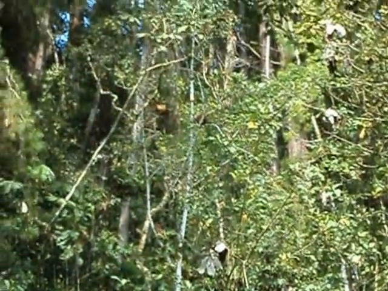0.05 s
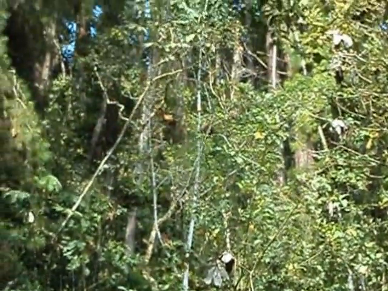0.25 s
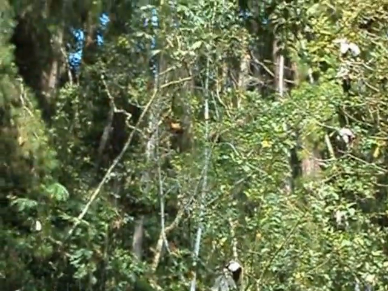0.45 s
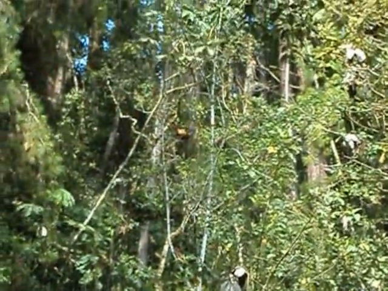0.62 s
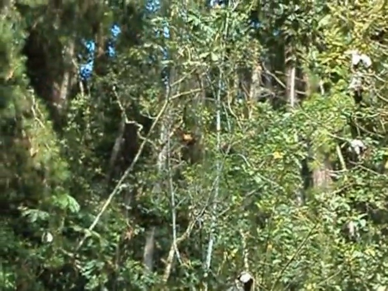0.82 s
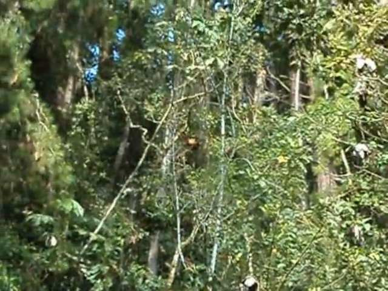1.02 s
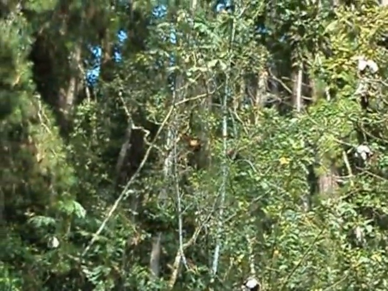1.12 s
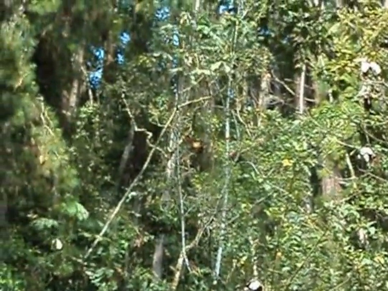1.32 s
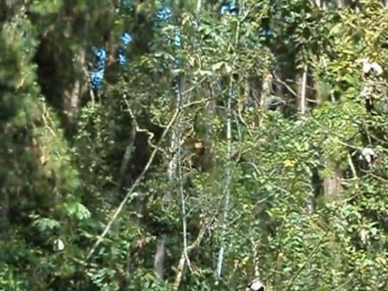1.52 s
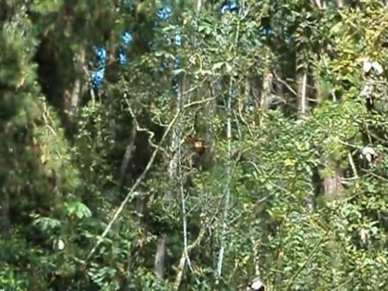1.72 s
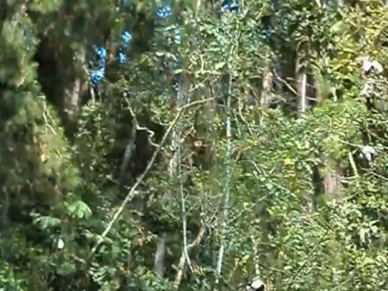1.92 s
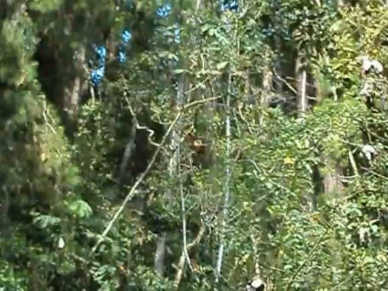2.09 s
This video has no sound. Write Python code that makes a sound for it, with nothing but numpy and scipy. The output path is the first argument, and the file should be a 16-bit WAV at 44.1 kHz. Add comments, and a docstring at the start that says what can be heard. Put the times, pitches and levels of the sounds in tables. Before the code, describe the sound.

One loud, sharp handling snap on a camera cuts into a faint, even outdoor hiss in a forest. Two dull pops come next, the hiss slowly recovers, and fingers click lightly on the case, close to the slightly muffled microphone.

```python
"""In a forest, on the microphone of a handheld camera: a soft, even hiss, and the case clicking
under the fingers. One hard snap right by the microphone overloads it; the gain control ducks the
forest and lets it swell back over a second. Two dull pops, the first on the heels of the snap, and
a few lighter clicks follow. The narrow-band recorder leaves little above 6 kHz."""
import sys
import numpy as np
from scipy import signal
from scipy.fft import rfft, irfft
from scipy.io import wavfile

SR = 44100
rng = np.random.default_rng(int(sys.argv[2]) if len(sys.argv) > 2 else 0)


def int16_out(signal):
    """Quantize to a 16-bit WAV file."""
    q = np.round(np.clip(np.atleast_2d(signal).T, -1, 1) * 32767)
    wavfile.write(sys.argv[1], SR, q.astype(np.int16))


N = 94815
T = np.arange(N) / SR


def from_db(db):
    """Decibels to gain."""
    return 10 ** (np.asarray(db) / 20)


def noise(gain):
    """Noise of rms 1 whose spectrum follows gain(Hz)."""
    hz = np.maximum(np.fft.rfftfreq(N, 1 / SR), 1)
    x = irfft(rfft(rng.standard_normal(N)) * gain(hz), N)
    return x / np.sqrt(np.mean(x ** 2) + 1e-20)


def noise_band(centre_hz, half_width_hz):
    """Noise of rms 1, 6 dB down at half_width_hz from its centre."""
    return noise(lambda hz: 1 / (1 + ((hz - centre_hz) / half_width_hz) ** 2))


def ring(start, modes):
    """Decaying sines, struck together at start seconds."""
    age = np.maximum(T - start, 0)
    return sum(from_db(db - 60 * np.minimum(age / t60, 10)) * np.sin(2 * np.pi * hz * age)
               for hz, db, t60 in modes)


def resonance(start, hz, width_hz):
    """One impulse through a resonance, peaking near 1."""
    impulse = np.full(N, 1e-18)
    impulse[int(start * SR)] = 0.47
    r = np.exp(-np.pi * width_hz / SR)
    return signal.lfilter([1, 0, -1], [1, -(1 + r * r) * np.cos(2 * np.pi * hz / SR), r * r], impulse)


def forest():
    """The forest air: a broad, slightly wavering hiss with a few faint, fluttering whirrs."""
    # Spectrum of the air. Each row: frequency in Hz, relative level in dB.
    air_spectrum = [(25, -0.5), (70, 3), (250, 0.5), (600, -1), (1100, -7), (2000, -11.5), (3000, -16),
                    (4900, -18.5), (5600, -25.5), (7000, -20)]
    # Narrow whirrs. Each row: centre in Hz, half-width in Hz, level in dB.
    whirr_bands = [(3380, 390, -67), (3960, 95, -68), (4220, 150, -67.5)]
    air_db, waver_db, flutter_db = -50, 0.5, 1
    points_hz, points_db = np.transpose(air_spectrum)
    air = noise(lambda hz: from_db(np.interp(np.log(hz), np.log(points_hz), points_db)))
    waver = noise_band(0, half_width_hz=6)
    flutter = noise_band(0, half_width_hz=15)
    whirrs = sum(from_db(db + flutter_db * flutter) * noise_band(hz, half_width)
                 for hz, half_width, db in whirr_bands)
    return from_db(air_db + waver_db * waver) * air + whirrs


def hard_snap():
    """The case snaps right by the microphone and rings briefly."""
    # Modes of the snap. Each row: frequency in Hz, level in dB, seconds to fall 60 dB.
    snap_modes = [(876, 1.5, 0.0053), (2963, -10.5, .02), (3370, 10, .0054), (6040, -1.8, 0.0053)]
    start, attack_s = 0.2188, 0.00019
    attack = 1 - np.exp(-np.maximum(T - start, 0) / attack_s)
    return ring(start, snap_modes) * attack


def gain_control(x):
    """The camera ducks just after a peak passes the threshold, holds, then recovers steadily."""
    threshold_db, reaction_s, hold_s, recovery_db_per_s = -10, 0.000747, 0.11, 17.5
    over_db = np.maximum(20 * np.log10(np.abs(x) + 1e-9) - threshold_db, 0)
    recovery_db = recovery_db_per_s * T
    duck_db = np.maximum.accumulate(over_db + recovery_db) - recovery_db
    held_db = np.maximum(duck_db, np.interp(T - hold_s, T, duck_db))
    return x * from_db(-np.interp(T - reaction_s, T, held_db))


def dull_pops():
    """The signal's resting level jumps, overshoots briefly and drifts back."""
    # Jumps in resting level. Each row: start in seconds, signed height, settling time in seconds.
    jumps = [(0.2211, -0.008, 0.57), (0.6217, 0.0087, 0.36)]
    rise_s, overshoot_s = 0.00007, 0.00083
    pops = np.zeros(N)
    for start, height, settle_s in jumps:
        age = np.maximum(T - start, 0)
        rise = 1 - np.exp(-age / rise_s)
        overshoot = 0.91 * np.exp(-age / overshoot_s)
        pops += height * rise * (np.exp(-age / settle_s) + overshoot)
    return pops


def light_clicks():
    """Under the fingers, each contact ticks, sets the case ringing and knocks the whole camera."""
    # Contacts on the case. Each row: start in seconds, tick peak in dB, tick centre in Hz,
    # tick width in Hz, low-pass in Hz, case ring in dB, knock in dB.
    contacts = [(1.1095, -41.5, 1500, 2500, 3500, -43, -55), (1.1400, -27.5, 3900, 900, 5560, -56, -55),
                (1.1407, -28.5, 1150, 595, 5000, -74, -64), (1.2419, -21, 900, 3400, 3840, -42, -29),
                (1.6003, -13.5, 2190, 3280, 4130, -26, -48), (1.6783, -18, 1960, 3400, 3860, -28, -31),
                (1.8612, -32, 4100, 600, 5000, -65, -61.5), (1.8634, -19.5, 3990, 895, 4500, -61, -46)]
    # Modes of the case. Each row: frequency in Hz, relative level in dB, seconds to fall 60 dB.
    case_modes = [(1081, -3, 0.019), (2410, -2.5, .010), (3240, -9, .010)]
    knock_hz, knock_t60_s = 640, 0.011
    clicks = np.zeros(N)
    for start, tick_db, tick_hz, width_hz, lowpass_hz, ring_db, knock_db in contacts:
        soften = signal.butter(2, lowpass_hz, fs=SR, output="sos")
        tick = signal.sosfilt(soften, resonance(start, tick_hz, width_hz))
        case = sum(from_db(db) * resonance(start, hz, width_hz=np.log(1000) / (np.pi * t60))
                   for hz, db, t60 in case_modes)
        knock = ring(start, [(knock_hz, knock_db, knock_t60_s)])
        clicks += from_db(tick_db) * tick / np.abs(tick).max() + from_db(ring_db) * case + knock
    return clicks


def scene():
    """The forest and, close up, the handled case in inverted polarity; mono."""
    return (forest() - hard_snap() - light_clicks())[None]


def record(dry):
    """The camera's recorder: gain control, overload, pops and self-noise, all in a narrow band."""
    ceiling, self_noise_db, band_edge_hz, top_cut_hz = 0.96, -75, 5955, 16600
    x = np.clip(gain_control(dry[0]), -ceiling, ceiling)
    x = x + dull_pops() + from_db(self_noise_db) * rng.standard_normal(N)
    x = signal.sosfiltfilt(signal.butter(9, band_edge_hz, fs=SR, output="sos"), x)
    x = np.clip(x, -ceiling, ceiling)
    return np.convolve(x, signal.firwin(201, top_cut_hz, fs=SR), "same")[None]


dry = scene()
out = record(dry)
int16_out(out)
```